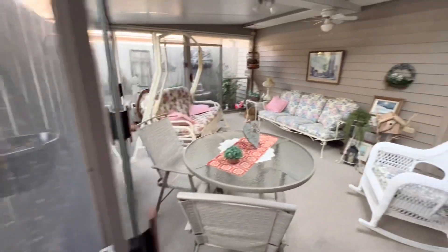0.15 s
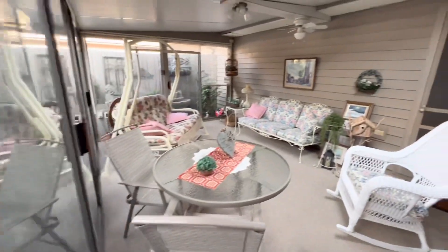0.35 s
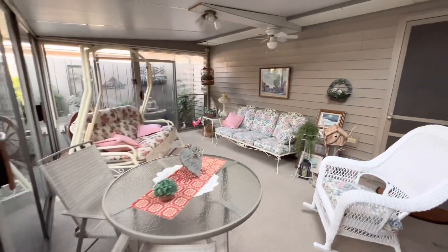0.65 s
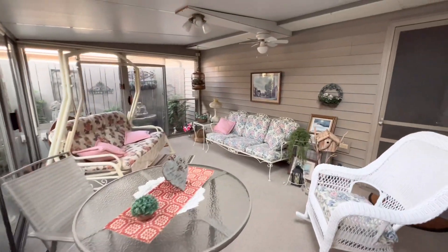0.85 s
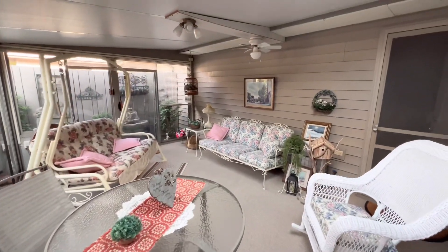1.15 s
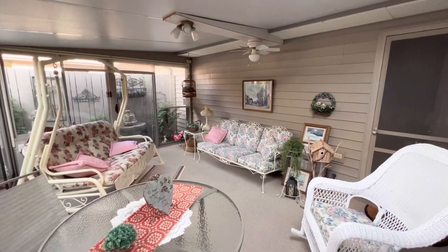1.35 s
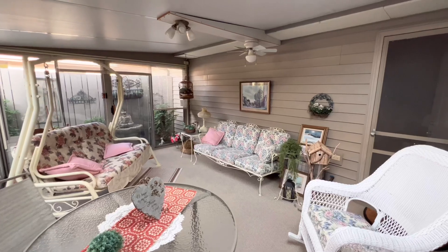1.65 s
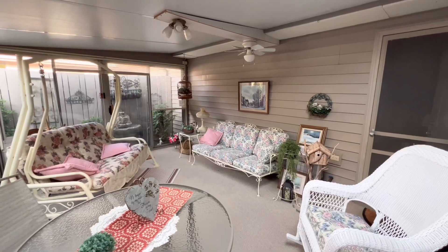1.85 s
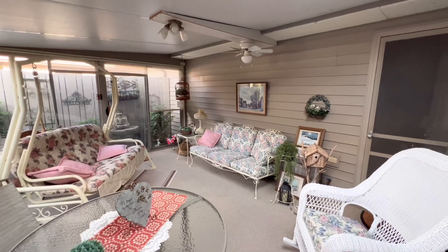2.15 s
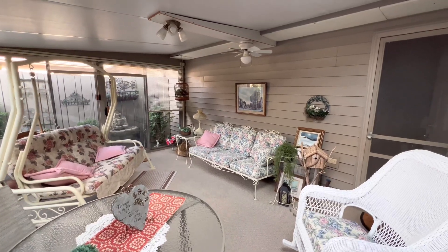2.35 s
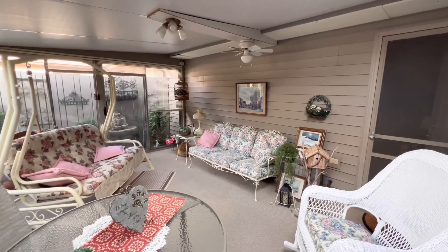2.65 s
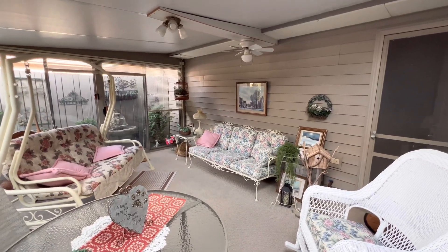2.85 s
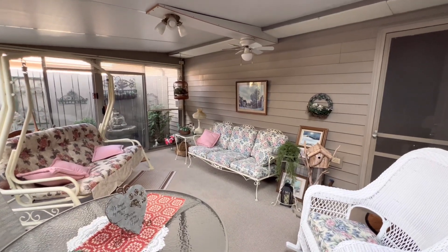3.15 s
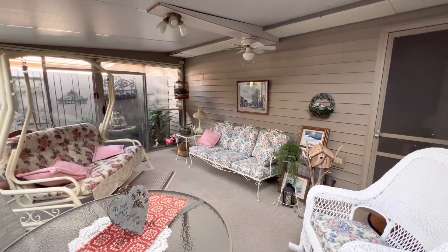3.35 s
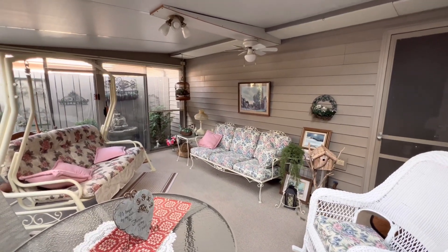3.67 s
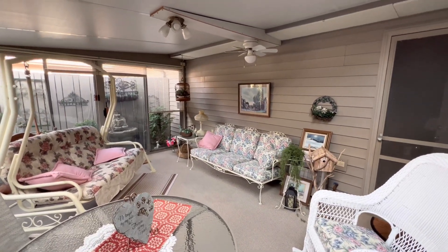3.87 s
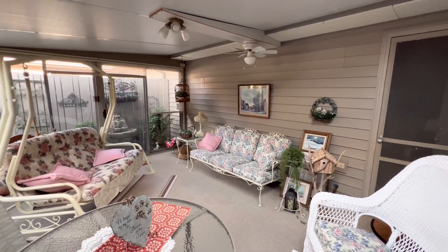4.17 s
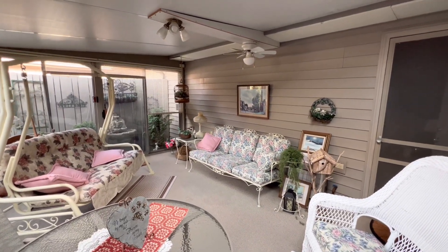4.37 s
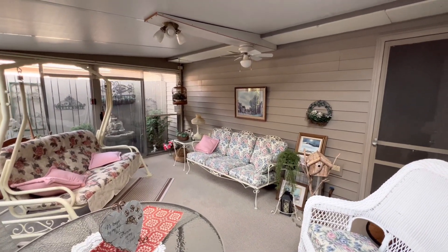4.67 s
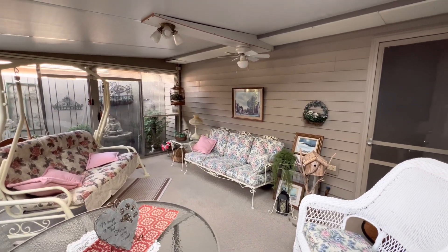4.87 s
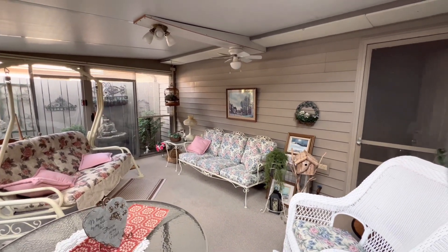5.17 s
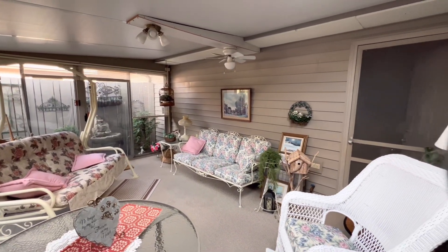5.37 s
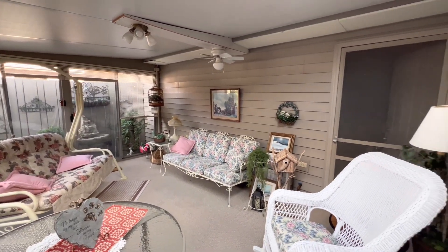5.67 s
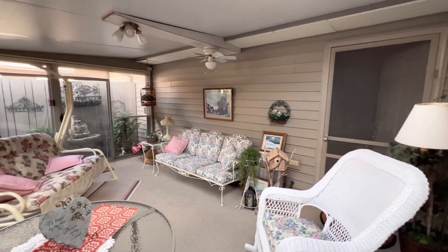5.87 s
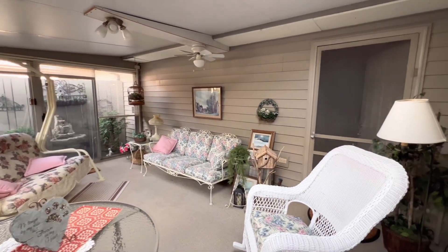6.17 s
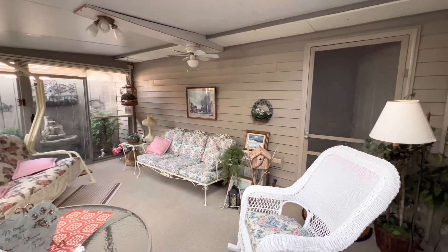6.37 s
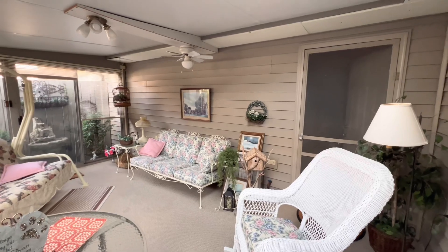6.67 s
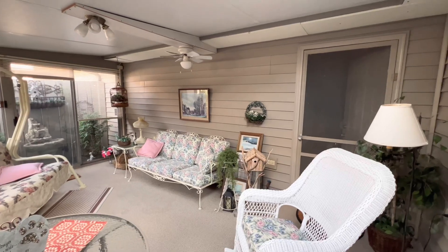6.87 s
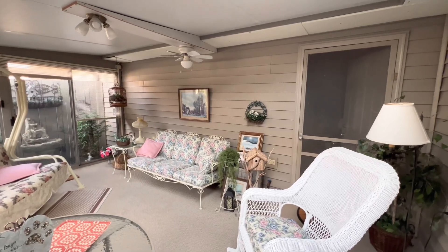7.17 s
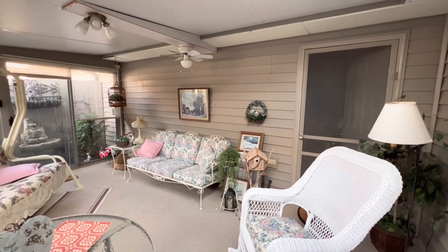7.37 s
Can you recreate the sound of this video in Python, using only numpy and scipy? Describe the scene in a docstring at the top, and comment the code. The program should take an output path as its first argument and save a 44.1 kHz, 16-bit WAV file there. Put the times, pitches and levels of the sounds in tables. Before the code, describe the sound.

A sliding glass door is tugged loose, rumbles briefly along its track and shuts with a loud knock. Soft thumps and rustling follow, then two sharp latch snaps and some lighter clicks. The door slides back for longer, with high squeaks and knocking wheels, and ends in a heavy, rattling slam. It is heard from nearby in an enclosed patio with a short echo and faint low background noise, brighter on the left.

```python
"""An enclosed patio room, the left microphone facing a sliding glass door and hearing more treble.
Clothes rustle, hands tap and feet thump. The door is pulled free, its wheels rattle over the gritty
track, and it knocks shut, ringing frame and pane. The metal latch snaps twice; then the door rolls
back, its seal sticking and slipping on the glass in a squeal, and slams.
The loudest blows overload the recorder."""
import sys
import numpy as np
from scipy import signal
from scipy.fft import rfft, irfft, next_fast_len
from scipy.io import wavfile

SR = 44100
rng = np.random.default_rng(int(sys.argv[2]) if len(sys.argv) > 2 else 0)


def persist_wave(psi):
    """Save psi, clipped to +-1, as 16-bit WAV."""
    counts = np.round(np.clip(psi, -1, 1) * 32767).astype(np.int16)
    wavfile.write(sys.argv[1], SR, np.atleast_2d(counts).T)


N = 331632


def from_db(db):
    """Decibels to gain."""
    return 10 ** (np.asarray(db) / 20)


def rms_one(x):
    """Scale to rms 1."""
    return x / np.sqrt(np.mean(x ** 2) + 1e-20)


def in_time(*tables):
    """Rows of (seconds, dB, ..) as gains per sample, fading out within 10 ms outside each table."""
    t, out = np.arange(N) / SR, 0
    for rows in tables:
        s, *columns = np.transpose(rows)
        fade = np.clip(np.minimum(t - s[0], s[-1] - t) / .01 + 1, 0, 1)
        out = out + fade * from_db([np.interp(t, s, c) for c in columns])
    return out


def at_hz(points, hz):
    """Read a (Hz, value) table on a log axis."""
    freqs, values = np.transpose(points)
    return np.interp(np.log(hz + 1), np.log(freqs), values)


def shaped(x, gain):
    """Filter by a gain given as a function of frequency."""
    size = next_fast_len(N + SR // 4)
    return irfft(rfft(x, size) * gain(np.arange(size // 2 + 1) * SR / size), size)[..., :N]


def coloured(x, spectrum):
    """Give a white signal a spectrum that falls steeply beyond its ends, at unchanged power."""
    ends = [(spectrum[0][0] / 2, -90), *spectrum, (spectrum[-1][0] * 2, -120)]
    return shaped(x, lambda hz: rms_one(from_db(at_hz(ends, hz))))


def noise(spectrum):
    """Steady noise of the given colour."""
    return coloured(rng.standard_normal(N), spectrum)


def lowpass(x, hz):
    """Second-order low-pass."""
    return signal.lfilter(*signal.butter(2, hz, fs=SR), x + 1e-18)


def drift(rate_hz):
    """A slow random wander of rms 1."""
    r = np.exp(-80 * np.pi * rate_hz / SR)
    slow = signal.lfilter([1], [1, -2 * r, r * r], rng.standard_normal(N // 40 + 2002))[2000:]
    return np.interp(np.arange(N) / 40, np.arange(len(slow)), rms_one(slow))


def grains(per_s, spread_db):
    """Random contacts of uneven size; rms 1."""
    sizes = from_db(spread_db * np.minimum(rng.exponential(1, N), 4)) * rng.choice([-1, 1], N)
    return rms_one(sizes * (rng.random(N) < per_s / SR))


def resonate(x, modes):
    """Parallel resonances (Hz, width in Hz, dB) with alternating signs."""
    out = 0
    for k, (hz, width, db) in enumerate(modes):
        r = np.exp(-np.pi * width / SR)
        gain = from_db(db) * (-1) ** k * (1 - r * r) / 2
        poles = [1, -2 * r * np.cos(2 * np.pi * hz / SR), r * r]
        out = out + signal.lfilter([gain, 0, -gain], poles, x + 1e-18)
    return out


def ring(clicks, hz, t60):
    """A unit click sets a sine of height 1 ringing."""
    r, w = from_db(-60 / (t60 * SR)), 2 * np.pi * hz / SR
    return signal.lfilter([0, np.sin(w)], [1, -2 * r * np.cos(w), r * r], clicks + 1e-18)


def narrow_band(curve, drive, half_width_hz):
    """A band, rung by two rows of noise or contacts, that follows a (seconds, Hz, dB) curve."""
    s, hz, db = np.transpose(curve)
    phase = 2 * np.pi * np.cumsum(np.interp(np.arange(N) / SR, s, hz)) / SR
    slow = lowpass(drive, half_width_hz)
    band = rms_one(slow[0] * np.cos(phase) + slow[1] * np.sin(phase))
    return in_time(np.transpose([s, db]))[0] * band


# Background colour. Each row: frequency in Hz, level in dB. Levels in all tables are relative.
AIR_SPECTRUM = [(15, -62.5), (25, -24.5), (48, -7), (129, -6), (144, -14.5), (305, -30), (508, -8.5),
                (582, -16), (684, -13.5), (1240, -31.5), (1800, -19.5), (2230, -39.5), (4030, -42.5),
                (5280, -45), (15500, -66)]
def still_air():
    """The still room and the street: a low, steady noise at both microphones."""
    return from_db(-47) * stereo(noise(AIR_SPECTRUM), noise(AIR_SPECTRUM))


# Movements. Each row: start and length in seconds, then dull, middle and bright levels in dB.
MOVEMENTS = [(0.339, 0.19, -50, -43, -54.5), (0.523, 0.071, -53, -43.5, -46.5),
             (0.71, 0.23, -74, -50.5, -53.5), (0.845, 0.011, -53, -51, -45.5),
             (0.948, 0.0079, -38, -29.5, -42.5), (1.06, 0.53, -66, -48.5, -51),
             (2.787, 0.088, -49, -66, -64.5), (2.967, 0.016, -52.5, -59, -52.5),
             (3.131, 0.17, -51.5, -46.5, -61), (3.491, 0.091, -54, -47, -51.5),
             (3.569, 0.014, -39, -39, -45.5), (3.656, 0.11, -43, -55, -70),
             (3.85, 0.098, -47.5, -53.5, -60), (4.004, 0.25, -49, -51, -62.5),
             (4.572, 0.13, -53, -50.5, -54), (4.958, 0.024, -50, -42.5, -56),
             (5.028, 0.12, -68, -53.5, -55.5), (5.233, 0.029, -44.5, -46.5, -50),
             (5.326, 0.0083, -62, -37.5, -53), (5.43, 0.03, -59, -43, -48.5)]
# Three colours of cloth and skin. Each row: frequency in Hz, level in dB.
CLOTH_DULL = [(47, -33), (80, -5.5), (167, -7), (253, 0.5), (298, -2.5), (491, -6.5), (700, -7), (910, -56),
              (1540, -120)]
CLOTH_MIDDLE = [(290, -58.5), (500, -1.5), (612, -11), (840, -4.5), (985, -8), (1290, -7.5), (1470, -9.5),
                (2800, -27), (3640, -28.5), (6160, -120)]
CLOTH_BRIGHT = [(1290, -44.5), (2200, -5), (2350, -3), (2570, -11.5), (4090, -5.5), (4820, -4),
                (5270, -7.5), (5810, -4.5), (7610, -11), (8740, -5), (11500, -21.5), (14300, -20.5),
                (15500, -28.5)]
def rustle(rise_s=.035, fall_s=.05):
    """Hands and clothes rub in clumps of fine grains; each movement swells, holds and dies away."""
    t = np.arange(N) / SR
    power = from_db([-57.5, -73, -72.5])[:, None] ** 2 * np.ones(N)   # never quite still
    for s, length, *levels in MOVEMENTS:
        swell = np.clip((t - s) / rise_s + 1, 0, 1)
        decay = np.exp(-np.clip(t - s - length, 0, 1) / fall_s)
        power += (from_db(levels)[:, None] * swell * decay) ** 2
    dull, middle, bright = np.sqrt(power)
    fine = grains(per_s=9000, spread_db=2) * from_db(2 * drift(12))
    out = dull * noise(CLOTH_DULL) + middle * coloured(fine, CLOTH_MIDDLE)
    return out + bright * (coloured(fine, CLOTH_BRIGHT) + track_ring(fine))


# The metal track. Its one row: frequency and width in Hz, level in dB.
TRACK_MODE = [(4750, 200, -14)]
def track_ring(contacts):
    """Fine contacts set the track ringing thinly."""
    (hz, width, db), = TRACK_MODE
    return from_db(db) * rms_one(resonate(contacts, [(hz, width, 0)]))


# Light knocks. Each row: start in seconds, then crack, tick and frame levels in dB.
LIGHT_KNOCKS = [(0.226, -50, -73, -56), (0.39, -43, -69, -62), (0.782, -43, -80, -68),
                (0.855, -34.5, -52, -51), (0.927, -46, -58, -48), (0.94, -34, -50.5, -36.5),
                (0.9608, -55, -48, -57), (3.1875, -47.5, -83, -39.5), (3.2994, -44, -61, -51),
                (3.5702, -35, -48, -49.5), (3.6425, -55, -61, -43.5), (4.1844, -17, -21.5, -31),
                (4.3018, -9, -19.5, -29), (4.314, -40, -63, -29.5), (4.346, -39.5, -56, -47),
                (4.6537, -48.5, -50.5, -52), (4.9597, -50, -67, -58), (5.1555, -57.5, -57.5, -57),
                (5.2372, -46, -51.5, -57), (5.323, -36, -63, -41), (5.449, -29.5, -57, -47)]
def light_knocks():
    """Small taps and clicks of hands, footsteps and the latch body snapping; weaker ones touch longer."""
    return [(s, crack, tick, frame, frame + .5, frame - 4, .13, 2 + .01 * max(-20 - crack, 0))
            for s, crack, tick, frame in LIGHT_KNOCKS]


# Modes of the door frame. Each row: frequency and width in Hz, level in dB.
FRAME_MODES = [(140.8, 8.5, -3.5), (147.2, 12.7, -5), (191.3, 24, -9), (252, 19.8, 1.5), (293, 28.7, 0),
               (326, 21.4, 1.5), (400, 102, -5), (509, 43.6, 4.5), (534, 60, -0.5), (609.5, 16.5, -2),
               (630, 30, -13), (809, 30, -3), (1100, 67, -13.5)]
def frame_halves(split_hz=380):
    """The low and the high modes of the frame."""
    return [m for m in FRAME_MODES if m[0] < split_hz], [m for m in FRAME_MODES if m[0] >= split_hz]


# A blow's crack at the door and out in the room, and its tick. Each row: frequency in Hz, level in dB.
CRACK_DIRECT = [(470, -46.5), (800, -19), (1320, 2), (1750, -7), (2340, -9.5), (3310, -14.5), (3760, -5),
                (4760, -7.5), (5500, -15.5), (7150, -18), (12100, -120)]
CRACK_IN_ROOM = [(470, -1.5), (800, 5), (1000, -1), (1500, 0), (2040, -4), (2340, -3), (3180, -6.5),
                 (5500, -16.5), (7150, -56), (12100, -120)]
TICK_SPECTRUM = [(2650, -20), (4500, -5.5), (4810, -2), (5250, -10), (5920, -2), (7660, -7), (8680, 1),
                 (9090, -1.5), (11500, -17.5), (13700, -19), (15500, -19)]
# Pane modes at depths 0, 1 and 2. Each row: frequency in Hz, level in dB, seconds to fall 60 dB.
THUD_MODES = [(80.5, -32.5, 0.7), (90.6, -15.5, 0.82), (102.3, 5.5, 0.29), (110.5, -15, 1), (126, 0.5, 0.3),
              (165.5, 7, 0.2)]
BOOM_MODES = [(55.3, -7.5, 0.48), (65.5, -3, 0.8)]
SWAY_MODES = [(44, -18.5, 1.44), (87.6, -15, 0.73)]
def door_blows(blows, db_per_depth=26.5, soft_ms=2.6):
    """Rattling contacts crack, tick and ring frame and pane; gives direct sound and feed to the room."""
    t, pushes = np.arange(SR // 10) / SR, np.zeros((5, N + SR))
    clicks = np.zeros((4, N))   # crack, tick, low frame, high frame
    for s, crack_db, tick_db, low_db, high_db, pane_db, depth, contact_ms in blows:
        start, age = round((s - .001) * SR), t * 1000 / contact_ms
        pulse = age * np.exp(1 - age)
        pane_levels = pane_db - db_per_depth * np.abs(depth - np.arange(3))
        pushes[:, start:start + len(t)] += from_db([crack_db, tick_db, *pane_levels])[:, None] * pulse
        strength = from_db([crack_db, tick_db, low_db, high_db]) * np.sqrt(np.sum(pulse ** 2))
        clicks[2, start] += strength[2]
        # a long contact lands as three touches
        when, share = ([.5, 1.1, 2.1], [.5, -.7, .5]) if contact_ms > soft_ms else ([.5], [1])
        clicks[[[0], [1], [3]], start + np.searchsorted(age, when)] += strength[[0, 1, 3], None] * share
    crack, tick, *pane = pushes[:, :N]
    cracks = np.array([crack * noise(CRACK_DIRECT), coloured(clicks[0], CRACK_IN_ROOM)])
    ticks = np.array([tick * noise(TICK_SPECTRUM), coloured(clicks[1], TICK_SPECTRUM)])
    out = from_db(.5) * cracks + from_db(6.5) * ticks
    for hits, modes in zip(clicks[2:], frame_halves()):
        out += from_db(25) * resonate(hits, [(hz, 2.04 * width, db) for hz, width, db in modes])
    for push, modes in zip(pane, (THUD_MODES, BOOM_MODES, SWAY_MODES)):
        out += from_db([[-46], [-56]]) * sum(from_db(db) * ring(push, hz, t60) for hz, db, t60 in modes)
    return out


# Thumps. Each row: start in seconds, level in dB, pitch in Hz.
BODY_THUMPS = [(0.943, -38, 240), (3.199, -32, 83), (3.304, -36, 85), (3.512, -41, 107), (3.585, -42, 238),
               (3.629, -31, 230), (3.672, -36, 237), (4.309, -31, 187), (4.335, -28.5, 199),
               (5.329, -30, 260)]
def thumps(t60_cycles=32, rise_s=.0014):
    """Feet and body meet floor and furniture, each time with one low, soft-edged ring."""
    age, out = np.arange(SR // 2) / SR, np.zeros(N + SR)
    for s, db, hz in BODY_THUMPS:
        at = round(s * SR)
        envelope = from_db(db - 60 * age * hz / t60_cycles) * np.tanh(age / rise_s)
        out[at:at + len(age)] += envelope * np.sin(2 * np.pi * hz * age)
    return out[:N]


# Slams. Each row: start in seconds, crack, tick, frame and pane levels in dB, depth, contact in ms.
DOOR_SLAMS = [(1.205, -29.5, -47, -26.5, -28, .1, 4.17), (1.2452, -27, -50, -8.5, -7, 0.048, 0.57),
              (1.254, -52, -29.5, -19.5, -24, 1.1, 3.67), (1.2709, -39, -21.5, -30.5, -1.5, 0.64, 1.56),
              (1.2987, -26, -29, -43, -3.5, 0.38, 0.83), (1.326, -31, -34, -26.5, -9, 0.044, 3.5),
              (2.2585, -24, -30, -23.5, -16, 0.49, 13.7), (2.275, 0, -14, -1, -7.5, 0.063, 0.67),
              (2.289, -42, -47, -10, -32, .05, 1.1), (2.3093, -40, -54, -13.5, 3.5, 1.8, 1.33),
              (7.3851, -16, -23.5, -15.5, -6, 0.07, 2.44), (7.4048, -2.5, -16, -9.5, 5, 0.45, 2.2),
              (7.426, -37, -32, -13, 13, 0.66, 0.86), (7.442, -11, -16.5, -7, -0.5, 0.044, 0.58),
              (7.4903, -47, -51, -33, 11.5, 0.78, 4.4)]
def slams():
    """Blows of the door jerking free or meeting the frame, whose low and high modes are hit alike."""
    return [(s, crack, tick, frame, frame, pane, depth, ms)
            for s, crack, tick, frame, pane, depth, ms in DOOR_SLAMS]


# The door's two runs. Each row: time in seconds, then rolling, pane rumble and track hiss in dB.
RUN_SHUT = [(1.36, -32, -34.5, -59), (1.44, -35, -27.5, -42.5), (1.574, -22.5, -31.5, -40.5),
            (1.7, -20.5, -29.5, -39.5), (1.77, -17.5, -29.5, -39.5), (1.85, -22.5, -33.5, -40),
            (2.036, -26.5, -28.5, -44.5), (2.178, -20.5, -28, -44.5), (2.25, -20.5, -35, -40.5)]
RUN_BACK = [(5.47, -50, -46, -39), (5.58, -28, -35, -26.5), (5.708, -27.5, -24, -37),
            (5.728, -21.5, -39, -33), (5.786, -22.5, -25, -34), (5.934, -23, -31.5, -34.5),
            (6.326, -27, -29.5, -36), (6.48, -27.5, -31, -36.5), (6.75, -27, -30.5, -33.5),
            (6.85, -31, -35, -37.5), (6.898, -27.5, -27, -36.5), (7.248, -31.5, -27, -37.5),
            (7.348, -28, -26, -33), (7.372, -26, -26, -30)]
# Colours of the shaken pane and of the grit. Each row: frequency in Hz, level in dB.
PANE_RUMBLE = [(15, -46), (25, -32), (40, -7.5), (54, 5), (95, 2.5), (150, -6.5), (174, -7), (200, -1),
               (260, -23.5), (440, -120)]
GRIT_SPECTRUM = [(410, 1.5), (700, 5.5), (764, 10), (1180, -1.5), (1310, 2.5), (1750, -6.5), (1980, -10.5),
                 (2630, -53.5), (2800, -8), (3640, -58), (6160, -120)]
def rolling():
    """Wheels run over grit on an uneven track: dense contacts shake pane, frame and brush strip."""
    roll, rumble, hiss = in_time(RUN_SHUT, RUN_BACK)
    drone, buzz, grit = (from_db(db + .76 * drift(3.3)) * roll for db in (-3.5, -2.5, -7))
    uneven = from_db(1.7 * drift(29))
    shake = grains(per_s=1500, spread_db=3) * uneven
    out = rumble * noise(PANE_RUMBLE)
    for gain, modes in zip((drone, buzz), frame_halves()):
        out += gain * rms_one(resonate(shake, modes))
    out += grit * (coloured(shake, GRIT_SPECTRUM) + from_db(-2.5) * wheel_rattle())
    out += sliding_sheen()
    fine, jolts = grains(per_s=20000, spread_db=1.5) * np.sqrt(uneven), shaken_grit()
    out += np.hypot(hiss, jolts) * track_hiss(fine)
    return out + wheel_scrape() + frame_hum() + wheel_knocks() + brush_fizz(fine, hiss, jolts)


def wheel_rattle(t60_cycles=20):
    """Loose wheels knock at random, each time ringing one of eight small parts."""
    hits, part = grains(per_s=60, spread_db=3.5), rng.integers(0, 8, N)
    pitches_hz = np.geomspace(500, 1800, 8)
    return rms_one(sum(ring(hits * (part == k), hz, t60_cycles / hz) for k, hz in enumerate(pitches_hz)))


# Colour of the track on each run. Each row: frequency in Hz, level in dB.
TRACK_SHUT = [(1290, -32), (2200, 3.5), (2900, -8.5), (3830, -4), (4290, -2), (4770, -2), (5400, -3),
              (6230, -1.5), (7500, -12), (9750, -40), (16500, -120)]
TRACK_BACK = [(1290, -10), (2200, 2), (2630, 2), (3350, -1), (4110, -3.5), (5260, -7.5), (5710, 0),
              (6840, -9.5), (7500, -46), (9750, -114), (16500, -120)]
# Singing wheels. Each row: frequency and width in Hz, level in dB.
WHEEL_RESONANCES = [(4220, 660, -6), (5700, 120, 6.5)]
def track_hiss(fine):
    """Fine grit hisses; the track rings as the door shuts and the wheels sing on the way back."""
    singing = from_db(-11 + 4 * drift(12)) * rms_one(resonate(fine, WHEEL_RESONANCES))
    shutting = coloured(fine, TRACK_SHUT) + from_db(3 * drift(10)) * track_ring(fine)
    return np.where(np.arange(N) < N // 2, shutting, coloured(fine, TRACK_BACK) + singing)


# Colour of the brush strip. Each row: frequency in Hz, level in dB.
BRUSH_SPECTRUM = [(3820, -48), (6500, -23.5), (7600, -1.5), (8260, 7.5), (9410, 3), (10100, 2.5),
                  (10900, -11.5), (11800, -44)]
def brush_fizz(fine, hiss, jolts):
    """The brush strip fizzes along with the track's hiss, the bumps and the seal's steady squeal."""
    _, seal = seal_gains()
    gain = np.hypot(from_db(-7) * hiss + from_db(1.5) * seal, from_db(-7) * jolts)
    return from_db(2.5 * drift(9.7)) * gain * coloured(fine, BRUSH_SPECTRUM)


# Top treble of the sliding, one list a run. Each row: time in seconds, level in dB.
SHEEN_RUNS = [
    [(1.37, -57), (1.45, -54), (1.7, -56), (1.78, -53), (1.88, -57), (2.25, -59)],
    [(5.47, -46), (5.6, -47), (5.73, -44), (5.86, -55), (6.05, -51), (6.2, -58), (6.4, -57), (6.6, -59),
     (6.72, -54), (6.95, -56), (7.2, -60), (7.37, -59)],
]
# Its colour. Each row: frequency in Hz, level in dB.
SHEEN_SPECTRUM = [(6470, -26), (11000, -5), (11700, -8), (14000, -5.5), (14800, -11), (15500, -14)]
def sliding_sheen():
    """The sliding door gives a smooth hiss above the fizz."""
    return from_db(2.5) * in_time(*SHEEN_RUNS)[0] * noise(SHEEN_SPECTRUM)


# Two tones of the frame. Each row: time in seconds, pitch in Hz, level in dB.
LOWER_HUM = [(1.45, 267.4, -31.5), (1.558, 283.4, -26.5), (1.644, 265, -35), (1.798, 274, -18),
             (1.858, 265, -32.5), (1.922, 291, -36), (1.974, 260, -38), (2.05, 250, -45)]
UPPER_HUM = [(1.6, 330, -28), (1.64, 313.5, -44), (1.744, 322.5, -16.5), (1.844, 342, -33),
             (1.89, 318.3, -19.5), (2.036, 329.3, -33.5), (2.104, 344.3, -16.5), (2.172, 335.9, -34.5),
             (2.198, 340, -19), (2.26, 350, -40.5)]
def frame_hum():
    """The frame hums on two wavering tones as the door rolls shut."""
    return from_db(-1.5) * sum(narrow_band(tone, rng.standard_normal((2, N)), half_width_hz=18)
                               for tone in (LOWER_HUM, UPPER_HUM))


# Joints in the track. Each row: start in seconds, frame and crack levels in dB.
TRACK_JOINTS = [(1.4893, -25, -50), (1.544, -33, -36), (1.677, -20, -28), (1.731, -37, -27.5),
                (1.7795, -16, -21), (2.0024, -21, -32.5), (2.1015, -29, -31.5), (2.1778, -33, -33.5),
                (5.9919, -22.5, -27.5), (6.727, -21, -32), (6.8323, -31, -34), (7.097, -25.5, -36),
                (7.232, -28, -31.5), (7.3072, -23, -31)]
def wheel_bumps():
    """Soft blows of a wheel crossing a joint, favouring the low modes of the frame."""
    return [(s, crack, crack - 40, frame, frame - 24, frame - 15, .2, 5.5)
            for s, frame, crack in TRACK_JOINTS]


def shaken_grit(rise_s=.006, fall_s=.025):
    """Each bump shakes up the grit: a gain that swells for a moment."""
    age, out = np.arange(SR // 4) / SR, np.zeros(N + SR)
    for s, _, crack_db in TRACK_JOINTS:
        at = round(s * SR)
        out[at:at + len(age)] += from_db(crack_db - 3.5) * np.tanh(age / rise_s) * np.exp(-age / fall_s)
    return out[:N]


# Latch strikes. Each row: start in seconds, level in dB, centre in Hz, dB lost per octave from it.
LATCH_STRIKES = [(4.1802, -19.5, 1600, 1), (4.1852, -11.5, 1650, 5), (4.298, -26, 3000, -1),
                 (4.303, -12.5, 1970, -6), (5.3205, -33, 3000, 11), (5.329, -11.5, 2350, 55),
                 (5.337, -12.5, 2590, 58), (5.448, -12.5, 990, 37)]
# The latch's metal. Each row: frequency in Hz, level in dB, seconds to fall 60 dB.
METAL_MODES = [(1080, -7, 0.024), (1127, -5, 0.046), (1460, -0.5, 0.026), (1773, 5, 0.026),
               (2010, 0.5, 0.029), (2530, -4.5, 0.022), (3430, 1, 0.016), (4250, 1, 0.012),
               (4800, 7, 0.0086), (5770, -1.5, 0.013), (7100, -7, 0.0072), (8300, -5, 0.01),
               (9100, -17, 0.009)]
def latch():
    """Tongue and handle strike metal, ringing each short mode with a strength of its own."""
    s, db, centre_hz, slope_db = np.transpose(LATCH_STRIKES)
    scatter_db, out = rng.normal(0, 1.5, (len(s), len(METAL_MODES))), np.zeros(N)
    for k, (hz, mode_db, t60) in enumerate(METAL_MODES):
        loss_db = slope_db * np.abs(np.log2(hz / centre_hz))
        clicks = np.zeros(N)
        clicks[np.round(s * SR).astype(int)] = from_db(db + mode_db - loss_db + scatter_db[:, k])
        out += ring(clicks, hz, t60) * (-1) ** k
    return out


# Chirps. Each row: start in seconds, level in dB, pitch in Hz, fall in Hz per ms, decay time in ms.
SEAL_CHIRPS = [(5.454, -21, 8500, -130, 4.7), (5.467, -19, 6900, -170, 4), (5.53, -21, 4800, -1, 8.3),
               (5.575, -16, 4800, -6, 14), (5.579, -9.5, 8550, -8, 10), (5.615, -10.5, 8800, -9, 9.2),
               (5.635, -12, 8800, 3, 7), (5.646, -16, 5530, 9.5, 12), (5.676, -15, 8040, 25, 5.8),
               (5.69, -11.5, 6400, 4, 6.6), (5.718, -9.5, 8300, -1, 7.4), (5.7328, -2.5, 8300, 9, 8.2),
               (5.745, -10, 8450, 17, 6), (5.7556, -12, 7350, 1, 5.5), (5.7893, -3, 8700, 65, 4.9),
               (5.843, -4.5, 8800, 68, 4.1), (5.919, -8.5, 9900, 20, 4), (5.949, -14, 10070, 1, 7.5),
               (6.0, -14.5, 9600, 2, 5.2), (6.0445, -14, 9400, 32, 3.3), (6.105, -17.5, 8600, 36, 4.4),
               (6.294, -15, 9700, 31, 7.5), (6.329, -10.5, 8770, 50, 3.4), (6.342, -14, 8100, 27, 3.4),
               (6.362, -24, 8520, 2, 15), (6.6594, -21, 9700, 30, 3.2), (6.8352, -16.5, 9100, 18, 4),
               (6.845, -16, 9800, 4, 5.4)]
def seal_chirps(roughness_hz=260):
    """The seal chirps on the glass: short sweeping tones, rough in level and phase."""
    waver = rms_one(lowpass(rng.standard_normal((2, N)), roughness_hz))
    age_ms, out = np.arange(SR // 10) / SR * 1000, np.zeros(N)
    for s, db, hz, fall, decay_ms in SEAL_CHIRPS:
        at = round(s * SR)
        flutter, bend = waver[:, at:at + len(age_ms)]
        phase = 2 * np.pi * age_ms * (hz - fall * age_ms / 2) / 1000
        tone = (1 + .45 * flutter) * np.sin(phase + .9 * bend)
        envelope = np.exp(-age_ms / decay_ms) * np.tanh(age_ms / decay_ms)
        out[at:at + len(age_ms)] += from_db(db) * tone * envelope
    return out


# The seal rubbing. Each row: time in seconds, gliding pitch in Hz, gliding and steady levels in dB.
SEAL_RUB = [(5.46, 4600, -50, -50), (5.51, 5000, -36, -38), (5.56, 5300, -27, -31), (5.62, 5500, -26, -31),
            (5.68, 6000, -26, -33), (5.76, 7400, -28, -28), (5.82, 8700, -30, -35), (5.89, 9500, -29, -42),
            (5.97, 10100, -27, -46), (6.04, 9400, -32, -46), (6.12, 8600, -33, -46), (6.19, 9300, -42, -50),
            (6.23, 8500, -42, -50), (6.27, 9800, -31, -48), (6.31, 9400, -30, -48), (6.35, 8100, -32, -47),
            (6.4, 9000, -44, -50), (6.55, 9200, -43, -50), (6.62, 9500, -33, -50), (6.69, 9300, -35, -50),
            (6.74, 9200, -43, -50), (6.81, 9300, -42, -50), (6.86, 9600, -34, -50), (6.91, 9800, -42, -50),
            (7.2, 9000, -46, -50), (7.29, 8600, -37, -46), (7.33, 9000, -42, -50), (7.37, 7200, -35, -46),
            (7.385, 7000, -40, -50)]
# Its steady resonances. Each row: frequency and width in Hz, level in dB.
SEAL_MODES = [(8100, 52, 21), (8450, 350, 3), (9570, 450, 9), (8600, 2300, 9)]
def seal_squeal(half_width_hz=1050, core_hz=300):
    """Stick-slip on the glass rings a broad gliding resonance, its overtone and steady modes."""
    s, hz, _, _ = np.transpose(SEAL_RUB)
    glide, steady = seal_gains()
    pitch = np.interp(np.arange(N) / SR, s, hz) * (1 + .033 * drift(30))
    phase = 2 * np.pi * np.cumsum(pitch) / SR
    slips = lowpass(rng.standard_normal((3, N)), half_width_hz)
    core = lowpass(rng.standard_normal((2, N)), core_hz)   # narrow heart of the glide
    slips[:2] += from_db(-2 + 4 * drift(30)) * core
    overtone = from_db(-8) * slips[2] * np.sin(2 * phase)
    band = slips[0] * np.cos(phase) + slips[1] * np.sin(phase) + overtone
    glide *= from_db(-7 + 4.9 * drift(29))
    steady *= from_db(3.5 * drift(35))
    ringing = resonate(grains(per_s=6000, spread_db=2), SEAL_MODES)
    return glide * rms_one(band) + steady * rms_one(resonate(ringing, [(8800, 4000, 0)]))


def seal_gains():
    """Gains of the gliding and the steady squeal."""
    return in_time([(s, glide_db, steady_db) for s, _, glide_db, steady_db in SEAL_RUB])


# The scrape. Each row: time in seconds, pitch in Hz, level in dB.
SCRAPE_CURVE = [(5.6, 2780, -42), (5.8, 2790, -36), (6.0, 2685, -34), (6.102, 2820, -39), (6.24, 2647, -55),
                (6.378, 2727, -45), (6.55, 2750, -42), (6.7, 2680, -30), (6.728, 2730, -29),
                (6.77, 2710, -35.5), (6.856, 2685, -33), (6.95, 2694, -46), (7.12, 2673, -30.5),
                (7.23, 2544, -32), (7.37, 2660, -46)]
def wheel_scrape():
    """A wheel scrapes on the way back: sparse contacts ring a narrow band."""
    chatter = np.array([grains(per_s=110, spread_db=3.5) for _ in range(2)])
    return from_db(-3.5) * narrow_band(SCRAPE_CURVE, chatter, half_width_hz=90)


# The loudest wheel knocks. Each row: start in seconds, level in dB, pitch in Hz.
LOUD_KNOCKS = [(5.845, -19, 1110), (5.995, -16, 1070), (6.203, -36, 1040), (6.232, -32, 950),
               (6.299, -29, 830), (6.334, -13, 1060), (6.395, -18, 1080), (6.426, -43, 1030),
               (6.55, -16, 1270), (6.579, -22, 1126), (6.601, -15, 930), (6.724, -15, 880),
               (6.796, -16, 870), (6.906, -19, 1125), (7.012, -18.5, 830), (7.071, -26, 1640),
               (7.129, -18, 1160), (7.234, -32, 2530)]
def wheel_knocks():
    """The wheels knock on the way back, each time with one short ring."""
    click, out = np.arange(SR // 5) == 0, np.zeros(N)
    for s, db, hz in LOUD_KNOCKS:
        at = round(s * SR)
        out[at:at + len(click)] += from_db(db - 1.5) * ring(click, hz, t60=.034)
    return out


# Diffuse sound at the microphone pair. Each row: frequency in Hz, correlation (held within -1 to 1).
PAIR_LIKENESS = [(40, .995), (90, 0.88), (150, 0.78), (300, 0.35), (600, -0.7), (1500, 0.056), (4000, 0.11),
                 (9000, -0.029), (15000, -1.9)]
def stereo(mid, side):
    """Left and right from two unrelated signals, alike in the bass and unlike in the treble."""
    alike = lambda hz: np.clip(at_hz(PAIR_LIKENESS, hz), -1, 1)
    mid = shaped(mid, lambda hz: np.sqrt(1 + alike(hz)))
    side = shaped(side, lambda hz: np.sqrt(1 - alike(hz)))
    return np.array([mid + side, mid - side]) / np.sqrt(2)


# The patio room's decay. Each row: frequency in Hz, seconds to fall 60 dB.
ROOM_DECAY = [(40, 0.27), (110, 0.4), (200, 0.35), (330, 0.26), (500, 0.18), (1500, 0.16), (4000, 0.23),
              (9000, 0.15), (15000, 0.062)]
def room(direct, spread, lag_s=.00013, shadow_hz=2500, shadow_share=.39):
    """Direct sound, later and duller at the right microphone, and a tail that dies band by band."""
    t, edges = np.arange(SR * 3 // 4) / SR, 25 * 2 ** np.arange(0, 9.6, .5)
    tail = np.zeros((2, len(t)))
    for low, high in zip(edges, edges[1:]):
        t60 = at_hz(ROOM_DECAY, np.sqrt(low * high))
        bandpass = signal.butter(2, [low, high], "band", fs=SR, output="sos")
        band = signal.sosfilt(bandpass, rng.standard_normal((2, len(t))))
        near = from_db(-60 * t / t60)
        far = from_db(-9 - 60 * t / t60 / 2.68)   # the far end answers weaker and dies slower
        tail += band * np.hypot(near, far) * np.tanh(t / .00034) * np.sqrt(2 * np.log(1000) / t60 / SR)
    wet = stereo(*signal.fftconvolve(spread[None], tail, axes=1)[:, :N])
    right = np.concatenate([np.zeros(round(lag_s * SR)), direct])[:N]
    right -= shadow_share * signal.lfilter(*signal.butter(1, shadow_hz, "high", fs=SR), right)
    return np.array([direct, right]) + wet


def scene():
    """Door and hands in the room over its still air; seal and latch sound close, with little room."""
    air = still_air()
    rubbing = from_db(-4) * (rolling() + rustle())
    blows, blows_to_room = door_blows(slams() + wheel_bumps() + light_knocks())
    close = from_db(2) * (seal_squeal() + seal_chirps()) + latch()
    direct = rubbing + close + blows + thumps()
    spread = rubbing + from_db(-.5) * (blows_to_room + from_db(-10) * close)
    return room(direct, spread) + air


# Balance of the microphones. Each row: frequency in Hz, left over right in dB.
LEFT_OVER_RIGHT = [(60, -2), (99, 0.5), (160, -0.5), (270, -2.5), (450, 1), (740, 4), (1220, 2.5),
                   (2010, 3.5), (3330, 3.5), (5500, 10.5), (9080, 11.5), (15000, -8)]
def record(dry, low_cut_hz=39.7, high_cut_hz=15953):
    """The left microphone is brighter, the deepest bass is lost, peaks clip and the top is cut."""
    def balance(hz):
        left = from_db(at_hz(LEFT_OVER_RIGHT, hz))
        return np.array([left, np.ones_like(hz)]) * np.sqrt(2 / (1 + left ** 2))

    mics = shaped(dry, balance)
    mics = signal.sosfilt(signal.butter(4, low_cut_hz, "high", fs=SR, output="sos"), mics)
    mics -= .93 * resonate(mics, [(7700, 160, 0)])   # narrow dip of the microphone port
    clipped = mics / (1 + np.abs(mics) ** 6) ** (1 / 6)
    high_cut = signal.cheby2(10, 40, high_cut_hz, fs=SR, output="sos")
    return np.clip(signal.sosfilt(high_cut, clipped), -1, 1)


dry = scene()
out = record(dry)
persist_wave(out)
```